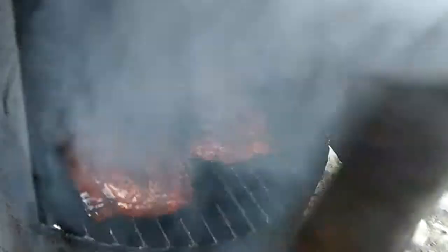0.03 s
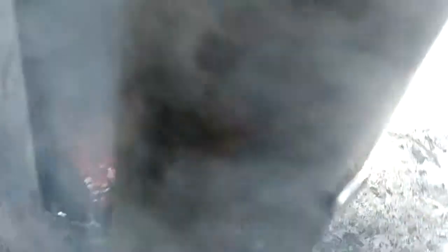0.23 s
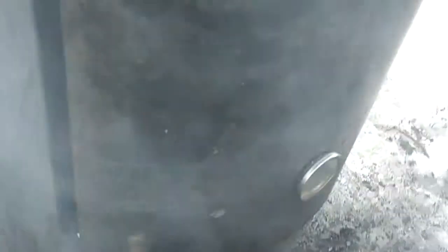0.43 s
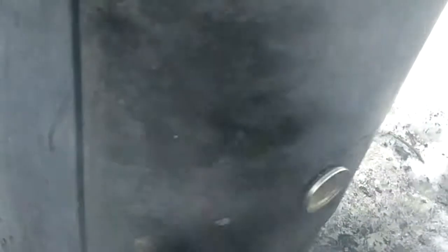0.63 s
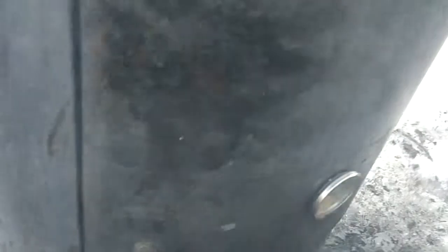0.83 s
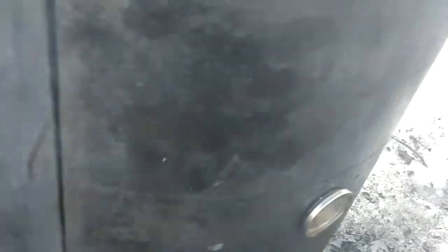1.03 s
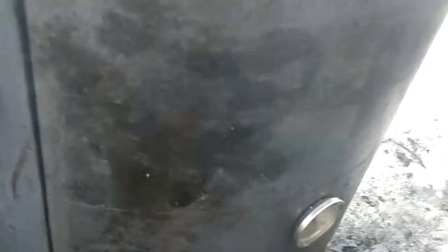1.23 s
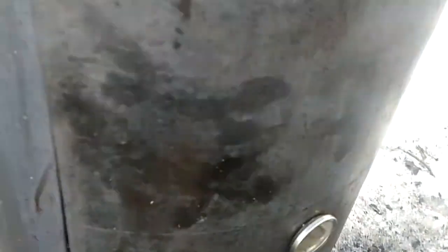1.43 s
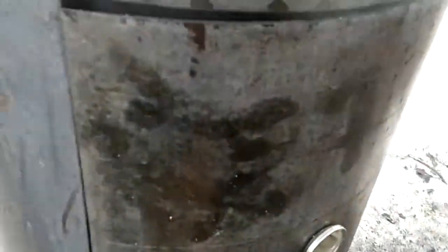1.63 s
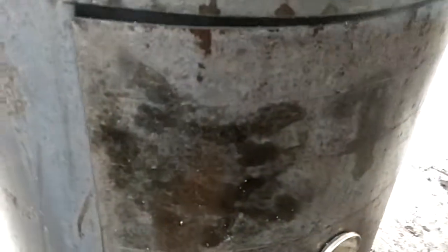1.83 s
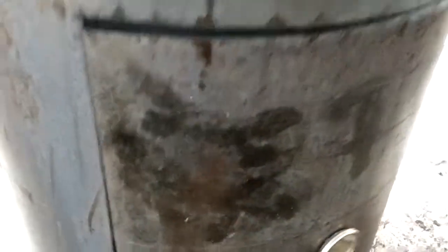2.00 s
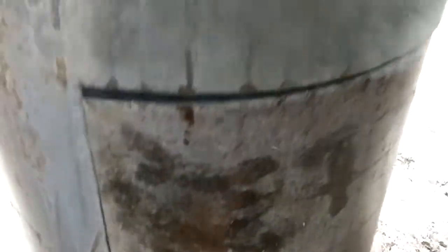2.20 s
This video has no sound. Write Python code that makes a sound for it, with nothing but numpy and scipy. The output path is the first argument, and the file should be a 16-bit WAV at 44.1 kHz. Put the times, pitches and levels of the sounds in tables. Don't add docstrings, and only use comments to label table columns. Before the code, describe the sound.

A heavy steel smoker lid slams shut with one harsh, overloading clank and short metallic ring

```python
import sys
import numpy as np
from scipy import signal
from scipy.fft import rfft, irfft
from scipy.io import wavfile

SR = 44100
rng = np.random.default_rng(int(sys.argv[2]) if len(sys.argv) > 2 else 0)


def dump_mix(stems):
    frames = np.atleast_2d(stems).T
    limited = np.clip(frames, -1, 1)
    pcm = np.round(limited * 32767).astype(np.int16)
    wavfile.write(sys.argv[1], SR, pcm)


def ratio(d):
    e = np.asarray(d, float) / 20
    return 10 ** e


N = 99621

SLAM_S, PUSH_DB, PUSH_HZ, PUSH_CYCLES = 1.4797, 5.3, 760, 1.8
# time after landing in seconds, level in dB.
CHATTER = [
    (.0012, -1),
    (.006, -9),
    (.012, -7.5),
    (.021, -17),
    (.030, -5.5),
    (.062, -25),
]
# pitch in Hz, level in dB, T60 in seconds.
LID_LOW_MODES = [(192, -30, .4), (205, -26, .45), (555, -17.5, 0.25), (646, -20, 0.22), (791, -19, 0.41),
                 (851, -18.5, 0.29), (900, -26, .45), (1036, -24.5, .45), (1233, -16, 0.28),
                 (1390, -23.5, .3), (1464, -20.5, 0.11), (1693, 1.5, .13), (2680, -17.5, 0.3),
                 (3166, -14.5, 0.14)]
# pitch in Hz, level in dB, T60 in seconds.
LID_HIGH_MODES = [(4770, -20.5, 0.13), (5300, -21, 0.077), (6180, -18.5, 0.089), (6620, -6, 0.1),
                  (6720, -14.5, .15), (7480, -12, 0.1), (7430, -17, 0.15), (7755, -7.5, 0.1),
                  (8520, -14.5, .12), (10530, -11.5, 0.079), (12100, -14.5, 0.06), (13200, -17.5, .04),
                  (14700, -18.5, .04), (15200, -22, .1)]
# pitch in Hz, level in dB, T60 in seconds.
BOOMS = [(98, -14.5, 0.29), (308, -19, .4), (502, -22, 0.6), (535, -21, 0.38), (1125, -21, 0.24)]
# frequency in Hz, level in dB per Hz.
PLATE_COLOUR = [(75, -24.5), (200, -15), (800, -9), (1500, -11), (3000, -8.5), (5000, -13), (7000, -8),
                (10500, -16), (15800, -37)]
# frequency in Hz, T60 in seconds.
PLATE_T60 = [(80, 0.79), (300, 0.43), (800, 0.42), (2000, 0.28), (5000, 0.17), (10000, .115), (16000, 0.16)]
LID_LOW_DB, LID_HIGH_DB, CROWD_DB = -4, -2, -15.5
SWELL_S, LONGEST_SWELL_S = 0.0065, 0.02
CLATTER_DB, CLATTER_RISE_S, CLATTER_HOLD_S = -13, 0.001, .02
LATE_DB, LATE_LONGER = -31, 2.2
CLATTER_THIN_HZ, CLATTER_THIN_DB = 1400, -5
CLATTER_PATCHY_DB = 4

# start in seconds, peak in dB, pitch in Hz, length in cycles, rumble in dB.
KNOCKS = [(.284, -40, 1100, 3.0, -35), (.503, -51, 200, 40.0, -20), (.512, -47, 128, 24.0, -26),
          (.748, -52, 350, 5.0, -7), (.770, -47, 105, 8.0, -17), (.855, -39, 205, 34.0, -18),
          (.878, -43, 115, 10.0, -22), (.975, -45, 210, 20.0, -12), (.9885, -33, 550, 3.0, -18),
          (1.1268, -31, 520, 5.0, -22), (1.2127, -26, 560, 6.0, -26), (1.232, -39, 550, 4.0, -20),
          (1.2435, -33, 400, 4.0, -21), (1.525, -21, 204, 34.0, -34), (1.605, -30, 206, 24.0, -30),
          (1.665, -36, 175, 10.0, -20), (1.705, -44, 200, 10.0, -14), (1.875, -46, 200, 8.0, -13),
          (1.895, -39, 95, 9.0, -18)]
# pitch in Hz, level in dB, T60 in seconds.
DRUM_MODES = [(206.1, -14, 0.28), (354.5, -11, 0.21), (528.5, -11.5, 0.21), (626.8, -14, 0.21),
              (800.3, -17.5, 0.22), (925.6, -16.5, .2), (1129, -22, .15)]
# frequency in Hz, level in dB per Hz.
RUMBLE = [(90, -13), (200, -2.5), (500, -3.5), (1100, -10.5), (1400, -25), (3000, -25)]
RUMBLE_T60_S = .33
# start in seconds, peak in dB, pitch in Hz, second pitch in Hz.
TICKS = [(.766, -39, 7300, 10500), (1.073, -44, 1900, 3450), (1.0735, -48, 7000, 5000),
         (1.126, -52, 3800, 7500), (1.206, -54, 1800, 4000), (1.213, -50, 7500, 2700),
         (.856, -54, 1500, 2700), (1.836, -45, 6600, 9500), (.9745, -50, 2700, 4200),
         (1.70, -52, 5300, 5900), (.767, -46, 8800, 12500)]
TICK_T60_S = .007

# start in seconds, length in seconds, centre in Hz, width in Hz.
RUBS = [(-.05, .36, 1130, 90), (.05, .2, 780, 120), (.52, .25, 4400, 1200), (.56, .17, 11300, 1500),
        (1.27, .205, 1850, 300), (1.29, .19, 3100, 500), (1.265, .215, 7100, 1100), (1.28, .19, 2350, 250),
        (1.29, .19, 4200, 900), (1.27, .2, 8800, 2500), (1.95, .19, 5400, 700), (1.93, .21, 7900, 1800),
        (1.76, .42, 240, 140), (1.3, .17, 300, 200), (1.7, .17, 300, 60), (.5, .12, 480, 250),
        (1.02, .09, 320, 200), (1.96, .08, 2800, 2000)]
RUB_DB = [-68, -67.5, -64.5, -72.5, -58.5, -58, -54, -64, -60.5, -64, -62.5, -57, -63, -61, -60, -65, -63,
          -66]
RUB_EDGE_S, RUB_SWELL = .04, 0.26
# start in seconds, length in seconds, level in dB,
# level of the dull part against the bright in dB, share of the stroke spent rising from 0 to 1.
SWISHES = [(-.05, 0.4, -59.5, -3.5, 0.41), (0.323, 0.2, -65.5, -4, 0.26), (0.493, 0.37, -65, 0, 0.38),
           (0.743, 0.046, -62.5, -3, 0.6), (0.855, 0.042, -54.5, -1, 0), (0.904, .035, -62, -8, .3),
           (0.971, 0.048, -54.5, -1.5, 0.2), (1.123, 0.024, -56.5, 1.5, 0.14),
           (1.211, 0.042, -56.5, 4.5, 0), (1.464, 0.019, -33, -7, 0.8), (1.669, 0.08, -57.5, 2, 0.61),
           (1.865, 0.074, -54, -2, 0.28), (2.14, 0.079, -55.5, -11.5, 0.67)]
# frequency in Hz, level in dB per Hz.
SWISH_BRIGHT = [(3000, -25), (5000, -18.5), (6500, -2), (7500, 0), (9000, -4.5), (11000, -18.5),
                (15000, -25)]
# frequency in Hz, level in dB per Hz.
SWISH_DULL = [(500, -8.5), (1100, -6), (1450, -10), (1900, -5.5), (3000, -6.5), (4300, -8), (5500, -10)]

# frequency in Hz, level in dB per Hz.
AIR = [(40, -8.5), (75, -5.5), (150, -11.5), (300, -24), (1000, -26.5), (3000, -32), (7000, -31.5),
       (15000, -39)]
AIR_DB = -59.5
DRONE_HZ, DRONE_WIDTH_HZ, DRONE_DB = 73, 14, -58
# frequency in Hz, likeness from -1 to 1.
LIKENESS = [(60, .94), (180, .9), (550, .55), (1650, 0), (3000, -.2), (6000, .05), (15000, .05)]
# frequency in Hz, left minus right in dB.
BALANCE_DB = [(60, -6.5), (240, 0), (950, 0.5), (3770, -1.5), (15000, 2)]
PORT_CUT_HZ, TOP, DRIVE_DB = 79.7, .97, 0


def rms_one(x):
    return x / np.sqrt(np.mean(x ** 2) + 1e-20)


def at_hz(points, hz):
    table = np.array(points)
    return np.interp(np.log(np.maximum(hz, 1)), np.log(table[:, 0]), table[:, 1])


def likeness(hz):
    return np.clip(at_hz(LIKENESS, hz), -1, 1)


def port_tilt(hz):
    return ratio(at_hz(BALANCE_DB, hz) / 2 * np.array([[1], [-1]]))


def two_ports(mid, side, hz):
    alike = likeness(hz)
    return np.sqrt(1 + alike) * mid + np.sqrt(1 - alike) * side * [[1], [-1]]


def drift(rate):
    r = np.exp(-80 * np.pi * rate / SR)
    slow = signal.lfilter([1], [1, -2 * r, r * r], rng.standard_normal(N // 40 + 2002))[2000:]
    return np.interp(np.arange(N) / 40, np.arange(len(slow)), rms_one(slow))


def ring(clicks, hz, t60):
    r, w = ratio(-60 / (t60 * SR)), 2 * np.pi * hz / SR
    return signal.lfilter([0, np.sin(w)], [1, -2 * r * np.cos(w), r * r], clicks + 1e-18)


def click(s, db):
    x = np.zeros(N)
    x[int(s * SR)] = ratio(db)
    return x


def soften(x, hz):
    return signal.lfilter(*signal.butter(2, hz, fs=SR), x)


def noise(spectrum, patchy_db):
    hz = np.arange(N // 2 + 1) * SR / N
    inside = np.clip(hz, spectrum[0][0], spectrum[-1][0])
    edge_db = -40 * np.abs(np.log2(inside / np.maximum(hz, 1)))
    mid, side = rfft(rng.standard_normal((2, N))) * ratio(at_hz(spectrum, hz) + edge_db)
    both = two_ports(mid, side, hz)
    strip = (np.log2(np.maximum(hz, 1) / 40) * 1.5).astype(int)
    groups = [irfft(both * (strip % 4 == k), N) for k in range(4)]
    return rms_one(sum(ratio(patchy_db * drift(30)) * group for group in groups))


def modes(hz, db, t60, turn, crowded):
    t, out = np.arange(int(.78 * SR)) / SR, np.zeros((2, N))
    apart = np.arccos(likeness(hz))[:, None] * turn[:, :1] * 0.71
    size = ratio(db) * port_tilt(hz)
    swell_s = np.minimum(SWELL_S * 1700 / hz, LONGEST_SWELL_S)[:, None]
    fade = ratio(-60 * t / t60[:, None]) * (1 - .7 * np.exp(-t / swell_s))
    hits = CHATTER if crowded else CHATTER[:2]
    for k, (lag, hit_db) in enumerate(hits):
        part = slice(k, None, len(CHATTER)) if crowded else slice(None)
        i = int((SLAM_S + lag) * SR)
        for port in range(2):
            phase = turn[part, 1:2] * 2 + apart[part] * (1 - 2 * port)
            wave = np.sin(2 * np.pi * hz[part, None] * t + phase) * fade[part]
            out[port, i:i + len(t)] += (ratio(hit_db) * size[port, part] @ wave)[:N - i]
    return out


def air_push():
    return soften(ring(click(SLAM_S, PUSH_DB), PUSH_HZ, PUSH_CYCLES * 2 / PUSH_HZ), 2 * PUSH_HZ)


def clear_modes():
    low = np.array(LID_LOW_MODES) + [0, LID_LOW_DB, 0]
    high = np.array(LID_HIGH_MODES) + [0, LID_HIGH_DB, 0]
    clear = np.vstack([low, high, BOOMS])
    turn = rng.choice([-1, 1], (len(clear), 2)) * [.7, 1]
    turn[:, 1] *= (1 + .1 * rng.random(len(clear))) ** 20
    return modes(*clear.T, turn, crowded=False)


def plate_crowd():
    chance = rng.standard_normal((900, 4))
    hz = 70 + 15900 * np.sort(rng.random(900)) ** 1.5
    packing_db = 10 * np.log10((hz / 4000) ** (1 / 3))
    db = at_hz(PLATE_COLOUR, hz) + packing_db + 2 * chance[:, 2]
    t60 = at_hz(PLATE_T60, hz) * np.exp(.08 * chance[:, 3])
    crowd = modes(hz, db, t60, chance, crowded=True)
    i = int(SLAM_S * SR)
    return ratio(CROWD_DB) * crowd / np.std(crowd[:, i:i + SR // 20])


def clank():
    return air_push() + clear_modes() + plate_crowd()


def clatter():
    n, out = SR * 3 // 4, np.zeros((2, N))
    t, hz = np.arange(n) / SR, np.arange(n // 2 + 1) * SR / n
    colour = ratio(at_hz(PLATE_COLOUR, hz) + CLATTER_THIN_DB * (hz < CLATTER_THIN_HZ)) * (hz > 60)
    uneven = rng.standard_normal(60)[(hz / 400).astype(int)] * np.clip(hz / 12000, 0, 1)
    mid, side = rfft(rng.standard_normal((2, n))) * colour * ratio(CLATTER_PATCHY_DB * uneven)
    both = two_ports(mid, side, hz) * port_tilt(hz)
    edges = 60 * 2 ** np.arange(0, 8.5, 1 / 3)
    whole, dying = 0, 0
    for low, high in zip(edges, edges[1:]):
        band = irfft(both * (hz >= low) * (hz < high), n)
        fall_db = -60 * np.maximum(t - CLATTER_HOLD_S, 0) / at_hz(PLATE_T60, low)
        whole = whole + band
        dying = dying + band * (ratio(fall_db) + ratio(LATE_DB + fall_db / LATE_LONGER))
    i = int((SLAM_S + .001) * SR)
    out[:, i:i + n] = (dying * np.minimum(t / CLATTER_RISE_S, 1) / np.std(whole))[:, :N - i]
    return ratio(CLATTER_DB) * out


def knocks():
    t, thump, tail = np.arange(N) / SR, np.zeros(N), np.zeros(N)
    blows = np.zeros((len(DRUM_MODES), N))
    mode_hz = np.array(DRUM_MODES)[:, 0]
    for s, db, hz, cycles, rumble_db in KNOCKS:
        thump += soften(ring(click(s, db + 1), hz, cycles / hz), 2 * hz)
        blow_db = db + rumble_db + 9 + rng.normal(0, 3, len(mode_hz))
        blows[:, int(s * SR)] = ratio(blow_db) / (1 + (mode_hz / (4.7 * hz)) ** 2)
        fall_db = -60 * np.maximum(t - s, 0) / RUMBLE_T60_S
        tail += ratio(db + rumble_db + fall_db) * np.clip((t - s) / 0.0021, 0, 1)
    drum = sum(ratio(db) * ring(blow, hz, t60) for blow, (hz, db, t60) in zip(blows, DRUM_MODES))
    return (thump + drum) * ratio([[.5], [-.5]]) + ratio(-0.5) * tail * noise(RUMBLE, patchy_db=1.5)


def ticks():
    out = np.zeros(N)
    for s, db, hz, other_hz in TICKS:
        pair = ring(click(s, db + 4), hz, TICK_T60_S) + ring(click(s, db + 2), other_hz, TICK_T60_S)
        out += signal.lfilter(*signal.butter(2, .7 * min(hz, other_hz), "high", fs=SR), pair)
    return out


def rubs():
    t, out = np.arange(N) / SR, np.zeros((2, N))
    for (s, length, hz, width_hz), db in zip(RUBS, RUB_DB):
        edges_hz = [hz - width_hz / 3, hz + width_hz / 3]
        band = signal.butter(1, edges_hz, "band", fs=SR, output="sos")
        swollen = s + np.clip(RUB_SWELL, .1, .8) * length
        times = [s - RUB_EDGE_S, swollen, s + length - RUB_EDGE_S / 2, s + length]
        stroke = np.interp(t, times, [0, 0.79, 0.99, 0.048])
        out += ratio(db) * stroke * rms_one(signal.sosfilt(band, rng.standard_normal((2, N))))
    return out


def swishes():
    t, bright, dull = np.arange(N) / SR, np.zeros(N), np.zeros(N)
    for s, length, db, dull_db, rise in SWISHES:
        peak = s + np.clip(rise, .03, .95) * length
        stroke = np.sin(np.pi / 2 * np.interp(t, [s, peak, s + length], [0, 1, 0])) ** 0.56
        bright += ratio(db) * stroke
        dull += ratio(db + dull_db) * stroke
    return bright * noise(SWISH_BRIGHT, patchy_db=.8) + dull * noise(SWISH_DULL, patchy_db=1.2)


def surroundings():
    drone = ring(rng.standard_normal(N + SR), DRONE_HZ, 2.2 / DRONE_WIDTH_HZ)[SR:]
    drone = ring(drone, DRONE_HZ, 1.1 / DRONE_WIDTH_HZ)
    return ratio(AIR_DB) * noise(AIR, patchy_db=2.5) + ratio(DRONE_DB) * rms_one(drone)


def scene():
    return clank() + clatter() + knocks() + ticks() + rubs() + swishes() + surroundings()


def low_pass(x):
    return signal.sosfilt(signal.butter(12, 15950, fs=SR, output="sos"), x)


def record(dry):
    port_cut = signal.butter(2, PORT_CUT_HZ, "high", fs=SR, output="sos")
    x = ratio(DRIVE_DB) * signal.sosfilt(port_cut, dry) / TOP
    mix = TOP * x / (1 + np.abs(x) ** 6) ** (1 / 6)
    return low_pass(mix)


dry = scene()
out = record(dry)
dump_mix(out)
```